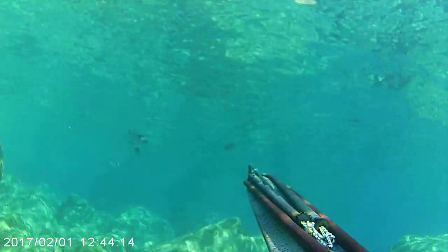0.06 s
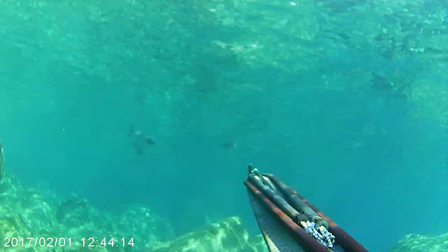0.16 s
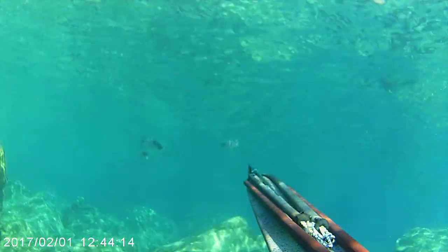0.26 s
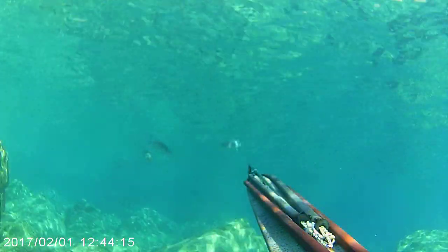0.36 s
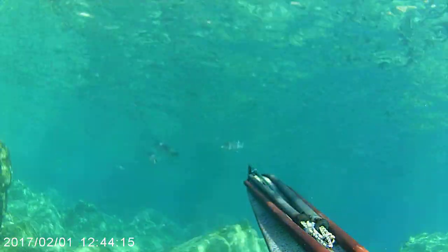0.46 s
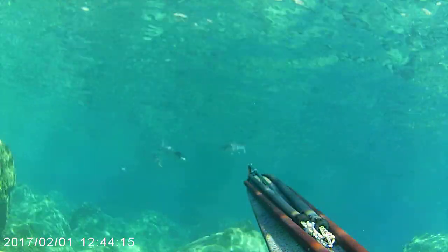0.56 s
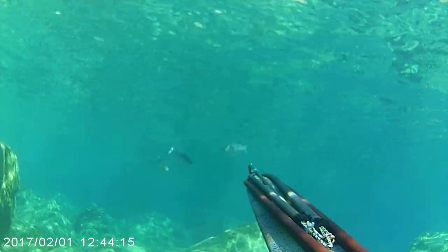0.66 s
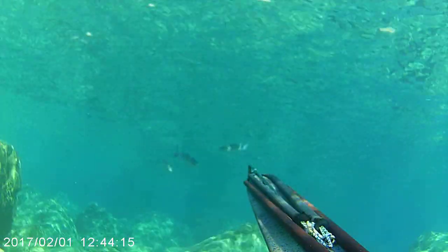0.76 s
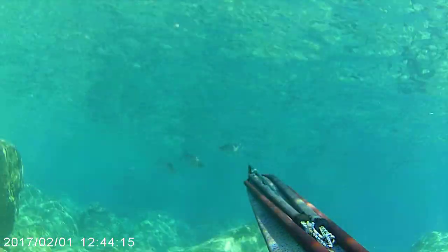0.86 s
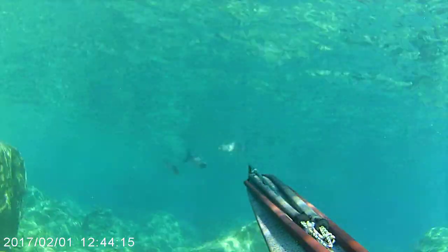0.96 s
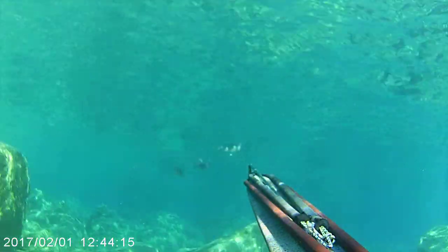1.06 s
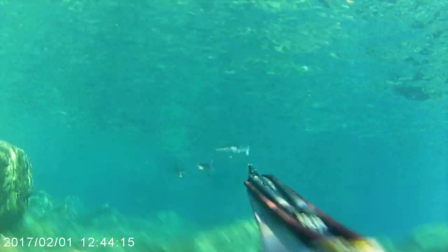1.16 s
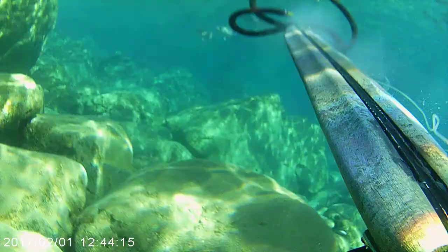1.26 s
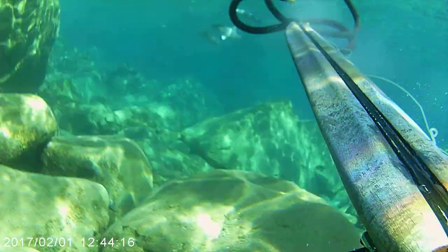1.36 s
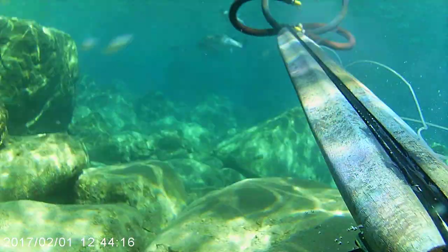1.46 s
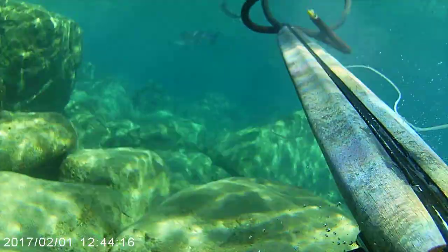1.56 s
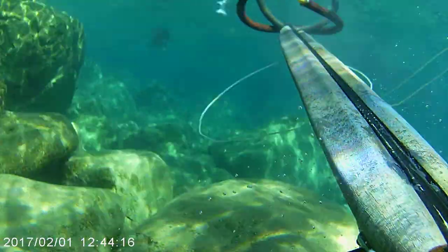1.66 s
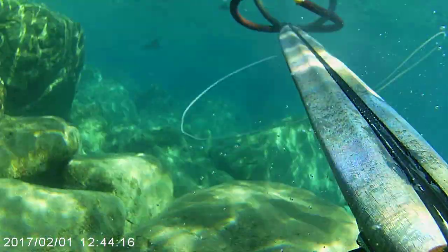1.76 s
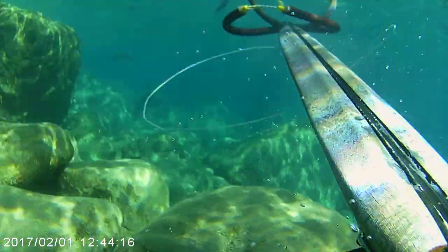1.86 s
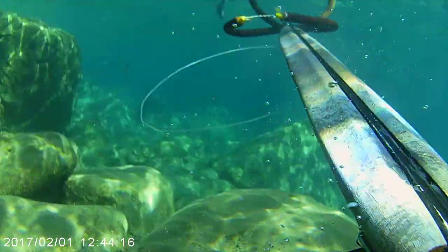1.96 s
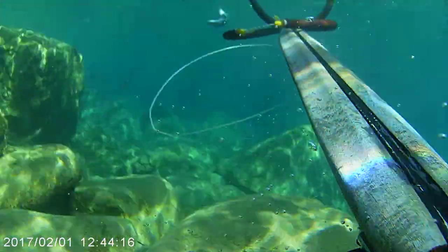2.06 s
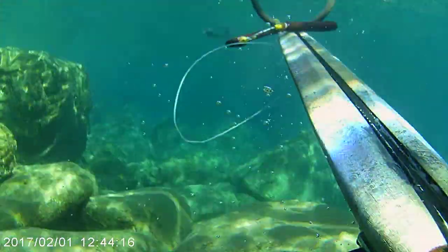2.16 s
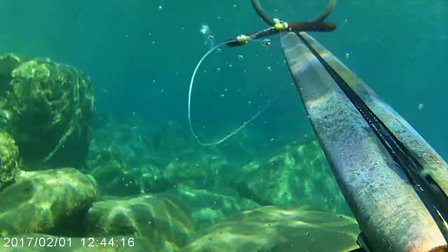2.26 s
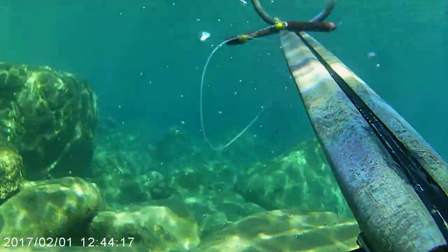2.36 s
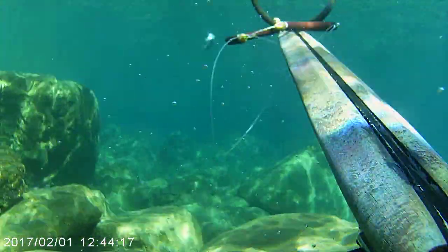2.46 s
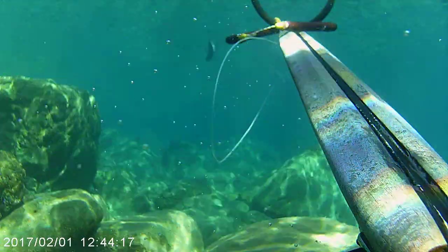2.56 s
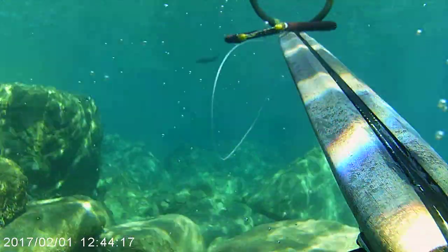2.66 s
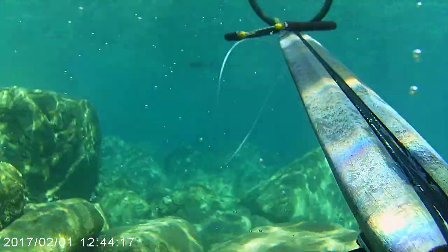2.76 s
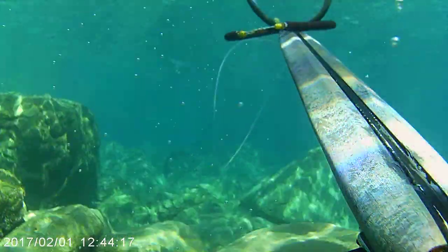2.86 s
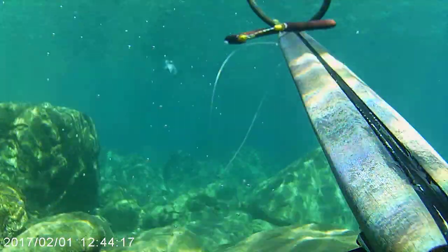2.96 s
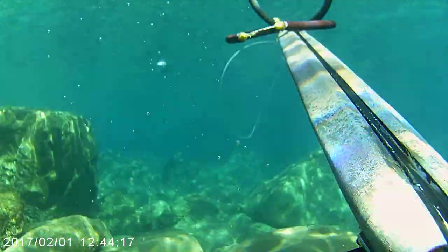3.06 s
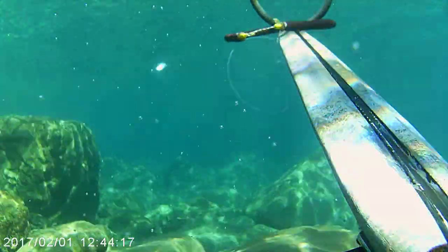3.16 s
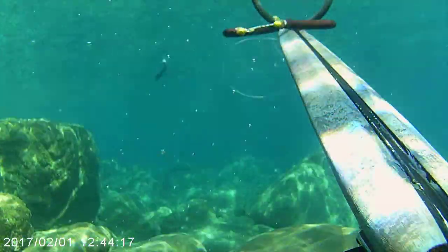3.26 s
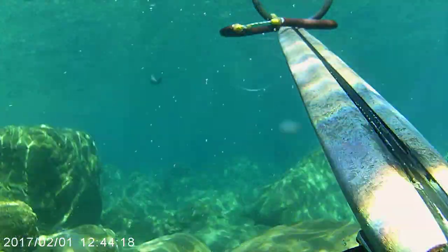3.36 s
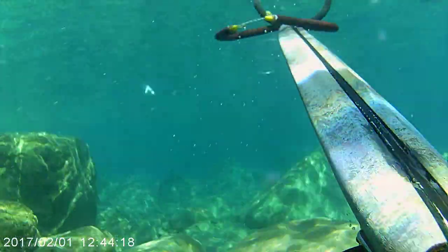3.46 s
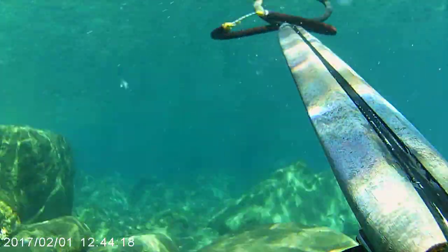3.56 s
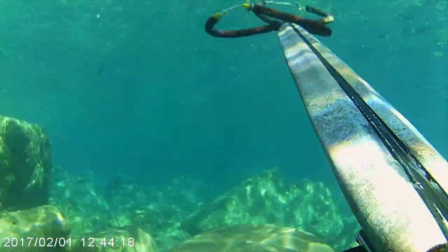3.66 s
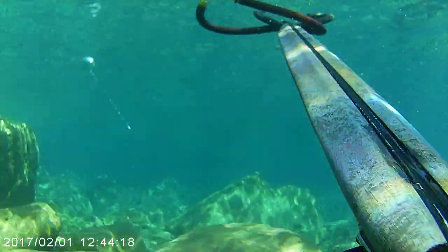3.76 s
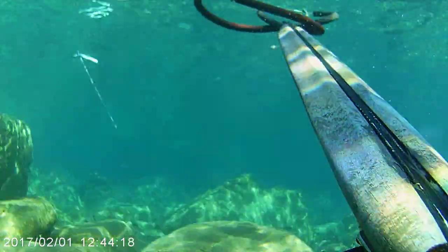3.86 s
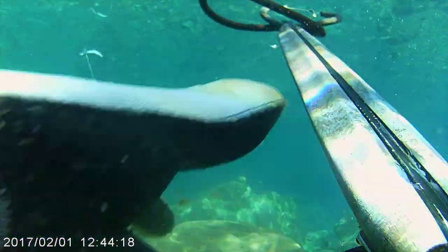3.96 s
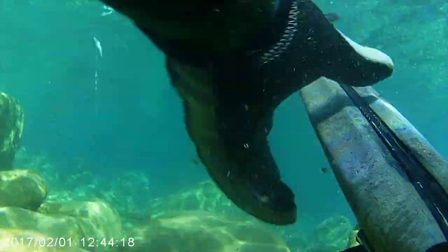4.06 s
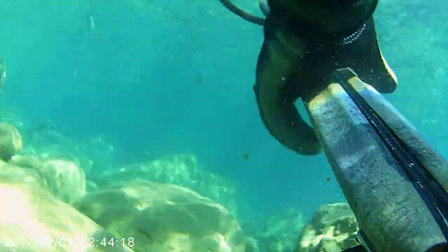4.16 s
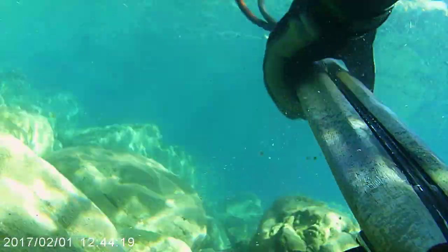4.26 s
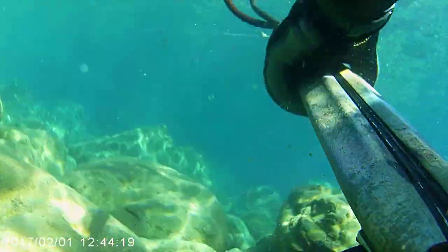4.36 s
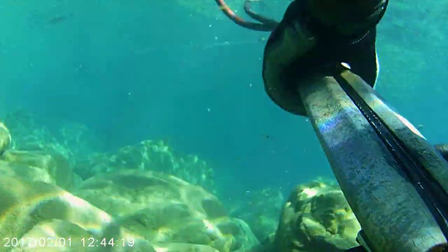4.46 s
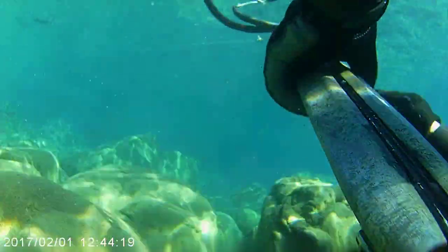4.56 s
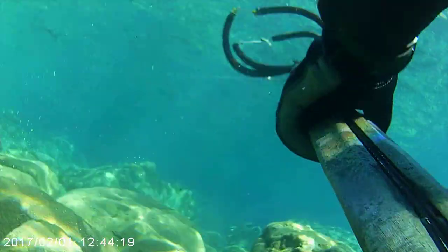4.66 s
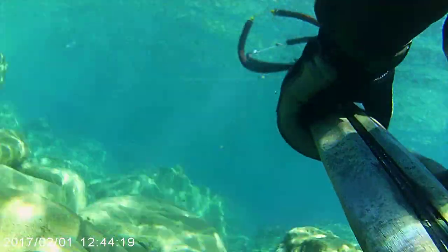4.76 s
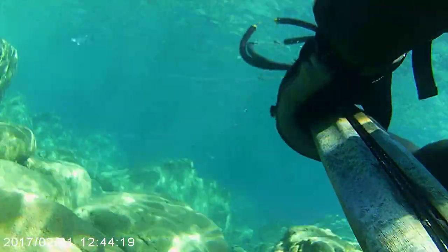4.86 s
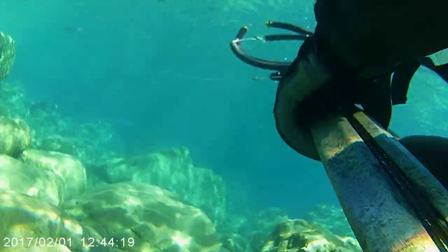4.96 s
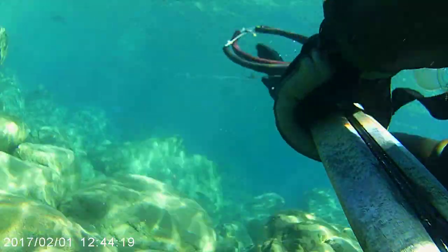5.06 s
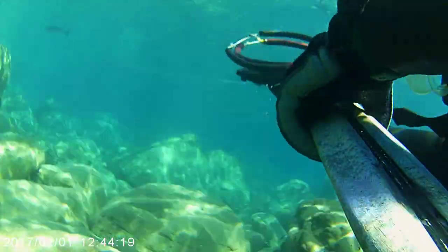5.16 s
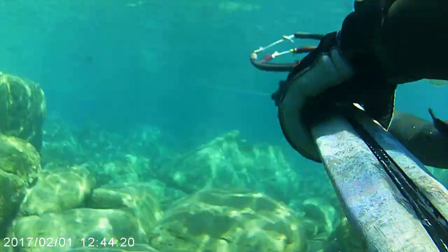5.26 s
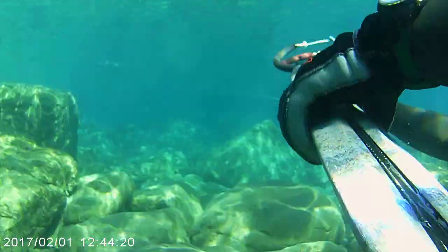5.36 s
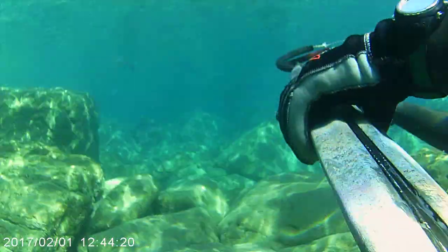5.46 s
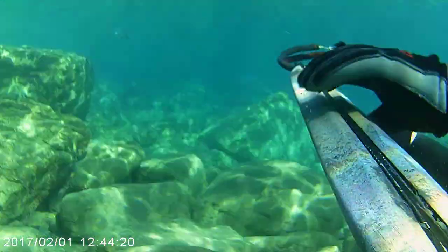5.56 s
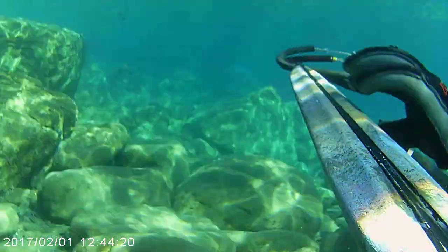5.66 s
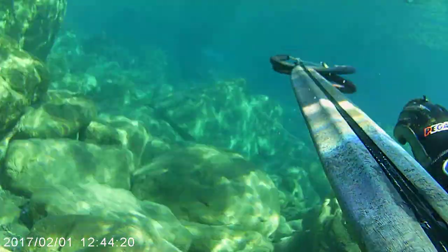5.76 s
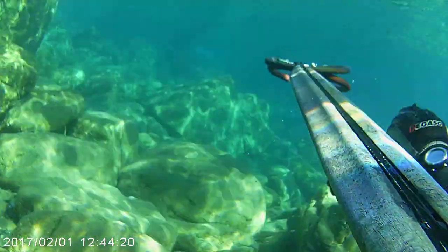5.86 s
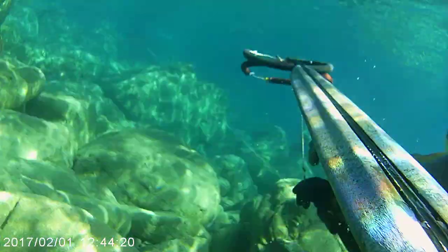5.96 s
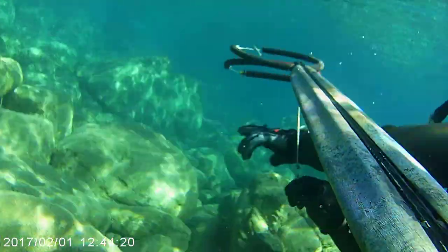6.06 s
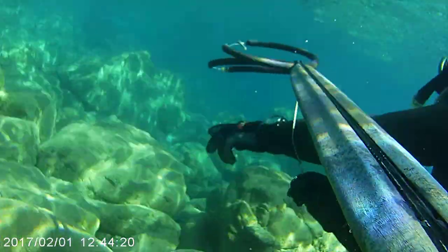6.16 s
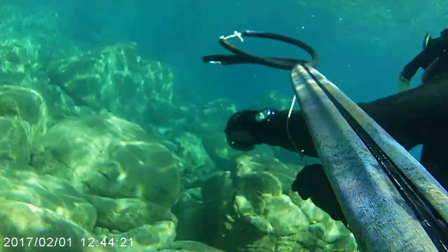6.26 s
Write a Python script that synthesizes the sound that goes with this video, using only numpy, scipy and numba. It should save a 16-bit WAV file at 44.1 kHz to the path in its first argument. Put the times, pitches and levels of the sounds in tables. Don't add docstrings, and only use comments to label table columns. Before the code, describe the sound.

Very close, boxy underwater sound from a camera housing fixed to a speargun barrel. Quiet rumbling water first, then a violent shot with elastic bands slapping the barrel, clipping hard. It falls away to soft line and rubber taps, thin metallic pings and two crisp clip ticks. A creak and rubbing come before a short heavy slam of the hand, followed by gentle scuffs, taps and a tiny squeak.

```python
import sys
import numpy as np
from scipy import signal
from scipy.io import wavfile
from scipy.ndimage import uniform_filter1d
from numba import njit

SR = 44100
rng = np.random.default_rng(int(sys.argv[2]) if len(sys.argv) > 2 else 0)


def boost_factor(decibels):
    exponent = np.asarray(decibels, float) / 20
    return 10 ** exponent


def output_pcm(signal):
    pcm = np.clip(np.atleast_2d(signal).T, -1, 1) * 32767
    wavfile.write(sys.argv[1], SR, np.round(pcm).astype(np.int16))


N = 278712

# f/Hz, t60/s, level/dB
HOUSING = [(83.7, 0.092, 1.5), (111.37, 0.11, 0.5), (166, 0.062, -8.5), (265, 0.077, -1), (349, 0.028, -7),
           (410.6, 0.02, -23.5), (541, 0.04, 2.5), (619, 0.055, -6.5), (688, 0.031, 4), (793, 0.0099, -3),
           (908.4, 0.033, 6.5), (1012, 0.029, -16.5), (1237, 0.024, -2), (1560, 0.0076, 7.5),
           (1844, 0.011, 1.5), (1850, 0.06, -18), (2480, 0.031, -6), (2800, 0.005, -7), (3250, 0.0064, -20),
           (4280, 0.005, -4.5), (5560, 0.016, -7.5), (7100, .008, -21.5)]
FIRED_S = 1.09


@njit
def ring(x, hz, t60):
    y, z = np.empty(len(x)), 0j
    pole = np.exp((2j * np.pi * hz - np.log(1000) / t60) / SR)
    for i in range(len(x)):
        z = z * pole + x[i]
        y[i] = z.imag
    return y


def band(x, lo_hz, hi_hz):
    y = signal.sosfilt(signal.butter(2, [lo_hz, hi_hz], "band", fs=SR, output="sos"), x)
    return y / np.std(y)


def walk(rate):
    k = int(SR / rate)
    return uniform_filter1d(np.repeat(rng.standard_normal(N // k + 1), k), k)[:N]


def effort(rows, rise, fall, rest_db):
    t = np.arange(N) / SR
    db = np.max([np.interp(t, [s - rise, s, s + hold, s + hold + fall], [rest_db, top_db, top_db, rest_db])
                 for s, hold, top_db in rows], axis=0)
    return boost_factor(db) * (t > FIRED_S)


def knocks(table, focus, hold):
    out, t = np.zeros(N), np.arange(6000) / SR
    grits = rng.standard_normal((len(table), len(t)))
    for (s, db, hz, spread_db, contact, top_hz), grit in zip(table, grits):
        u = t / np.clip(contact, 0.0003, 0.03)
        push = grit * (1 - np.exp(-4 * u)) * np.exp(-u)
        sound = 0
        for k, (f, t60, mode_db) in enumerate(HOUSING):
            near = np.exp(-(np.log(f / hz) / focus) ** 2)
            detune = 1 + 0.012 * grit[-k]
            gain = near + boost_factor(mode_db + spread_db - 11.5)
            sound = sound + gain * ring(push, f * detune, t60 * (1 + hold * near))
        softness = signal.butter(6, min(top_hz, 9000), fs=SR, output="sos")
        sound = signal.sosfilt(softness, sound)
        i = int(s * SR)
        out[i:i + len(t)] += (boost_factor(db) * sound / np.abs(sound).max())[:N - i]
    return out


def blows():
    # t/s, drive level/dB, spread level/dB, contact length/s
    shot = [(1.099, -13.5, -7, .007), (1.1092, 21, 5.5, 0.0057), (1.115, 21.5, 11.5, 0.0047),
            (1.126, 9.5, -0.5, 0.0015), (1.135, 25, -2, 0.0022), (1.142, 22, 10, .0019),
            (1.163, 3, -18.5, 0.0012), (1.172, 5.5, -11, 0.0034), (1.199, 8, -3.5, 0.0023),
            (1.2076, 19, 7.5, 0.0043), (1.221, -13.5, 9, 0.008), (1.2539, 3, -14, 0.0067),
            (1.282, -17.5, -3, .0025), (1.313, 10, 2, 0.0014), (1.346, -7, -13, 0.00097),
            (1.413, -12.5, 6, 0.0059), (1.447, -25, 5, .002), (1.452, -3.5, -9, 0.0019),
            (1.474, -20, -11, 0.0081)]
    # t/s, drive level/dB, spread level/dB, contact length/s
    grab = [
        (4.5293, -6.5, -10, .001),
        (4.543, 15.5, -5, 0.0027),
        (4.5605, 5.5, -7, .0005),
        (4.576, 2, -24, 0.008),
        (4.609, -2.5, -21, 0.0083),
        (4.634, -19, 7, 0.0058),
        (4.66, -20, -24, 0.0079),
        (4.70, -17.5, -23, 0.0069),
    ]
    # t/s, peak level/dB, favoured f/Hz, contact length/s
    thuds = [
        (1.112, 13.5, 91, 0.0033),
        (1.148, 14, 99, 0.0027),
        (1.22, -13, 250, 0.0072),
        (1.269, -5.5, 266, 0.0084),
        (4.576, 6.5, 96, .006),
        (4.638, -10.5, 88.5, 0.012),
        (4.68, -6, 99, 0.0029),
    ]
    slack_s = 1.38
    brighter = 0.15
    slaps = []
    for s, db, spread_db, contact in shot:
        hz, top_hz = (621, 4860 * boost_factor(brighter * db)) if s < slack_s else (727, 2350)
        slaps.append((s, db, hz, spread_db, contact, top_hz))
    for s, db, spread_db, contact in grab:
        slaps.append((s, db, 393, spread_db, contact, 3360 * boost_factor(brighter * db)))
    deep = [(s, db, hz, -13.5, contact, 470) for s, db, hz, contact in thuds]
    return knocks(slaps, focus=0.24, hold=0.042) + knocks(deep, focus=0.42, hold=0.05)


def sway():
    # t/s, level/dB, f/Hz, t60/s
    shoves = [(1.112, 11, 43.3, 0.46), (1.1762, 6, 58, 0.47), (1.1954, 12, 25.7, 0.27),
              (1.228, -6.5, 60, 0.13), (1.259, -1.5, 14, 0.29), (3.626, -23.5, 29.6, 1.2),
              (3.691, -15, 36.8, 0.37), (4.079, -12, 35, 0.4), (4.233, -8, 33, 0.75),
              (4.532, 32, 114.5, 0.093), (4.5525, 7.5, 21, 0.57), (4.68, -15, 22, .6),
              (5.198, -14.5, 37, 0.72), (5.363, -13.5, 25.2, 0.65)]
    # t/s, level/dB, f/Hz, t60/s
    tugs = [
        (1.287, -19, 41.7, 0.57),
        (1.354, -12, 22.15, 0.78),
        (4.5304, 2, 270, .058),
        (4.5374, 20, 37.3, 0.096),
        (4.5662, 16, 43.35, 0.083),
        (4.591, -1, 26.9, 0.94),
        (4.667, -1, 38, 0.22),
        (4.713, -9.5, 34.4, 0.32),
    ]
    out, t = np.zeros(N + SR), np.arange(SR) / SR
    jolts = [(*r, 1) for r in shoves] + [(*r, -1) for r in tugs]
    for s, db, hz, t60, way in sorted(jolts):
        swing = np.sin(2 * np.pi * hz * t) * np.exp(-np.log(1000) * t / t60)
        i = int(s * SR)
        out[i:i + SR] = out[i:i + SR] * np.exp(-t / 0.0003) + way * boost_factor(db) * swing
    return out[:N]


def touches():
    # t/s, peak level/dB, favoured f/Hz, spread level/dB
    taps = [(1.521, -20.5, 526, 15), (1.83, -29.5, 680, -19), (2.57, -37, 690, -19), (2.622, -27, 690, -3),
            (2.689, -24, 704, 6), (2.776, -31.5, 233, -14), (2.812, -26, 857, 0), (2.967, -34, 705, -12),
            (3.197, -29.5, 770, -18), (3.248, -28.5, 965, -14), (3.419, -25, 980, -4),
            (4.075, -13, 598, -3), (4.261, -26.5, 554, -5), (5.171, -28, 510, -13),
            (5.196, -15.5, 504, -24), (5.226, -27, 700, -17), (5.272, -32.5, 930, -7),
            (5.296, -31.5, 705, -9), (5.336, -42, 510, -18), (5.357, -25, 560, -16), (5.2, -20, 429, -15),
            (5.865, -29.5, 501, -12), (5.954, -38, 280, -18), (6.065, -32.5, 686, -18),
            (6.212, -23, 721, -15)]
    # t/s, peak level/dB, favoured f/Hz, spread level/dB
    flicks = [(1.566, -29, 553, -3), (2.938, -20.5, 680, -16), (4.311, -23.5, 530, 2),
              (3.808, -28.5, 900, -7), (3.898, -22, 960, -12), (4.234, -28, 660, -3), (4.291, -22, 540, -5),
              (3.338, -19, 520, -17), (5.15, -21.5, 674, -6), (5.379, -31, 734, 1), (5.522, -24.5, 705, 0),
              (6.217, -29.5, 695, -13), (6.241, -22.5, 735, -21), (6.287, -20, 707, -14)]
    # t/s, peak level/dB, favoured f/Hz, spread level/dB
    pings = [
        (1.627, -39.5, 3200, -10),
        (1.758, -35, 3170, 0),
        (1.933, -29.5, 3200, 11),
        (2.362, -41, 3160, -13),
        (3.474, -26, 2800, -5),
        (3.564, -43, 3220, -14),
        (3.574, -22.5, 3250, -15),
    ]
    # t/s, peak level/dB, favoured f/Hz, spread level/dB
    ticks = [
        (3.808, -14.5, 2810, 8),
        (3.899, -19.5, 2700, 7),
    ]
    # t/s, peak level/dB, favoured f/Hz, spread level/dB, contact length/s
    creaks = [
        (2.853, -14.5, 265, -2.5, 0.0051),
        (3.22, -21, 540, -26, 0.012),
        (4.126, -7.5, 537, -8, 0.0075),
    ]
    # t/s, peak level/dB
    squeaks = [
        (5.41, -46),
        (5.44, -42),
        (5.466, -45.5),
    ]
    out = knocks([r + (0.005, 1200) for r in taps], focus=0.057, hold=0.9)
    out += knocks([r + (0.00099, 2070) for r in flicks], focus=0.053, hold=0.67)
    out += knocks([r + (0.0025, 3600) for r in pings], focus=0.044, hold=0.41)
    out += knocks([r + (0.00053, 3360) for r in ticks], focus=0.072, hold=0.18)
    out += knocks([(*r, r[2] + 410) for r in creaks], focus=0.046, hold=0.76)
    out += knocks([(s, db, 1550, -28, 0.5, 1900) for s, db in squeaks], focus=0.05, hold=4.6)
    return out


def stroke_gains():
    # t/s, hold/s, level/dB, brightness/dB
    strokes = [(1.112, 0.05, -16.5, -5), (1.258, 0.0057, -16, -4.5), (1.316, 0.0058, -16, -1.5),
               (1.401, 0.066, -32, -14.5), (1.644, 0.13, -42.5, -17.5), (2.583, 0.044, -40.5, -17.5),
               (2.935, 0.015, -36.5, -18), (3.205, 0.074, -40.5, -14), (3.685, 0.029, -39.5, -13.5),
               (3.971, .09, -38, -12.5), (4.077, 0.0064, -23, -19.5), (4.117, 0.056, -20.5, -15),
               (4.179, 0.02, -24, -10), (4.257, 0.24, -42, -13), (4.574, 0.088, -23.5, -12.5),
               (4.848, 0.14, -41, -15), (5.164, 0.12, -41.5, -13), (5.317, 0.031, -38.5, -18),
               (5.407, 0.056, -41, -14)]
    rise_s, fall_s = 0.022, 0.058
    drag_db = -49.5
    dull = [(s, hold, db) for s, hold, db, bright_db in strokes]
    bright = [(s, hold, db + bright_db) for s, hold, db, bright_db in strokes]
    return effort(dull, rise_s, fall_s, drag_db), effort(bright, rise_s, fall_s, drag_db - 16.5)


def rubbing():
    grit = rng.standard_normal(N) * boost_factor(3.5 * walk(60) + 3.5 * walk(300))
    low = sum(boost_factor(db) * ring(grit, float(f), t60) for f, t60, db in HOUSING[4:12])
    high = sum(boost_factor(db) * ring(grit, float(f), t60) for f, t60, db in HOUSING[12:16])
    dull, bright = stroke_gains()
    return dull * band(low, 350, 733) + bright * band(high, 1100, 2310)


def crackle():
    slips_per_s = 180
    slips = (rng.random(N) < slips_per_s / SR) * rng.standard_normal(N)
    top = sum(ring(slips, float(f), 0.005) for f, t60, db in HOUSING[16:])
    dull, bright = stroke_gains()
    return boost_factor(-21) * band(top, 2200, 4600) * bright


def buffeting():
    # t/s, hold/s, level/dB
    swings = [
        (1.22, 0.025, -8),
        (1.4, 0.12, -28),
        (1.95, 0.16, -37),
        (2.88, .04, -37),
        (3.55, 0.08, -30),
        (4.05, 0.18, -23),
        (4.6, 0.052, -20.5),
        (5.15, 0.18, -24.5),
        (6.2, 0.11, -37),
    ]
    swirl = boost_factor(3 * walk(15)) * band(rng.standard_normal(N), 52, 125)
    return boost_factor(-4) * effort(swings, rise=0.2, fall=0.25, rest_db=-49.5) * swirl


def sea():
    # f/Hz, level/dB per Hz
    spectrum = [(8.8, -31), (15, 3), (38, -3), (90, -6.5), (153, -13.5), (200, -16.5), (454, -26.5),
                (491, -28), (1270, -39.5), (1940, -44), (2530, -47), (7670, -51.5), (8300, -53.5),
                (10800, -72), (18300, -120)]
    # f/Hz, level/dB
    whine = [
        (5184, -81.5),
        (6557, -76),
        (8000, -64.5),
    ]
    out, (f, db) = 0, np.transpose(spectrum)
    for hz in 16 * 2 ** np.arange(0, 9.1, 0.5):
        here_db = np.interp(np.log(hz), np.log(f), db) + 10 * np.log10(hz)
        here_db = here_db + 0.46 * walk(9.6) * (hz < 500)
        out = out + boost_factor(here_db) * band(rng.standard_normal(N), hz / 2 ** 0.25, hz * 2 ** 0.25)
    t = np.arange(N) / SR
    tones = sum(boost_factor(tone_db + 3.5) * np.sin(2 * np.pi * hz * t) for hz, tone_db in whine)
    return boost_factor(-30) * out / out.std() + tones


def scene():
    return (blows() + sway() + touches() + rubbing() + crackle() + buffeting() + sea())[None]


def roll_off(x):
    return signal.sosfilt(signal.butter(12, 16860, fs=SR, output="sos"), x)


def record(dry):
    clip, limit = 0.705, 0.715
    cut = signal.ellip(8, 0.1, 70, 8200, fs=SR, output="sos")
    flat = np.clip(signal.sosfiltfilt(cut, dry), -clip, clip)
    smooth = signal.sosfiltfilt(cut, flat)
    edges = smooth + boost_factor(-11.5) * (flat - smooth)
    mix = np.clip(edges, -limit, limit)
    return roll_off(mix)


dry = scene()
out = record(dry)
output_pcm(out)
```